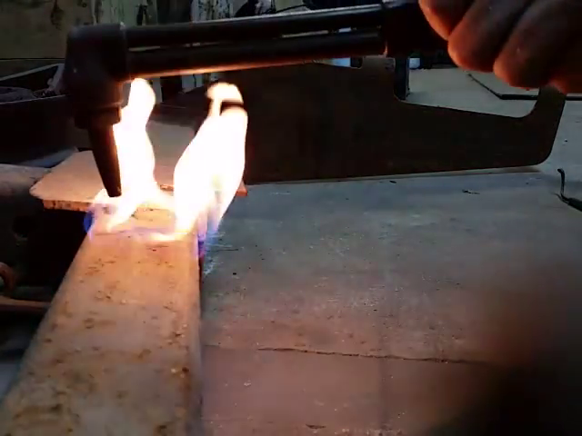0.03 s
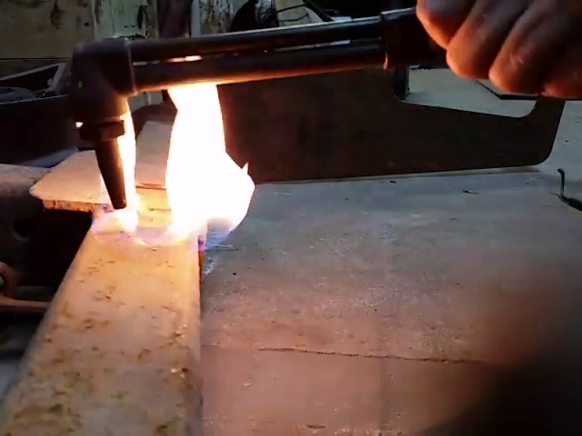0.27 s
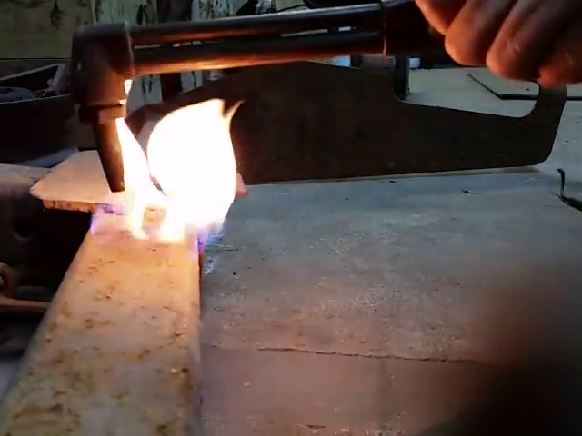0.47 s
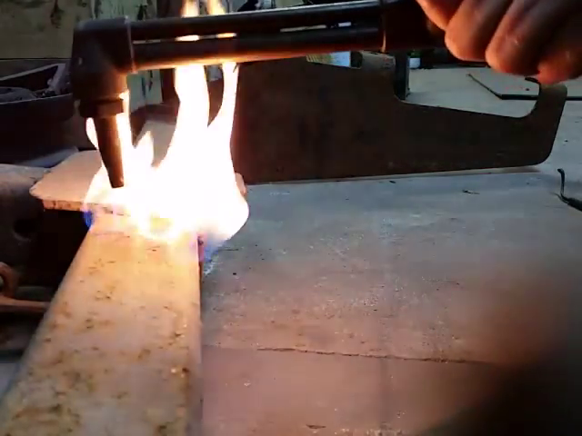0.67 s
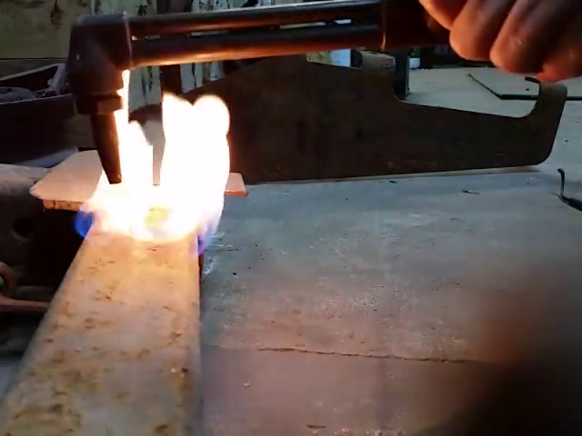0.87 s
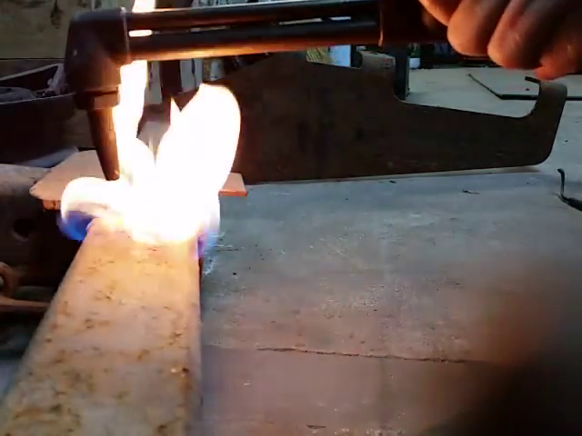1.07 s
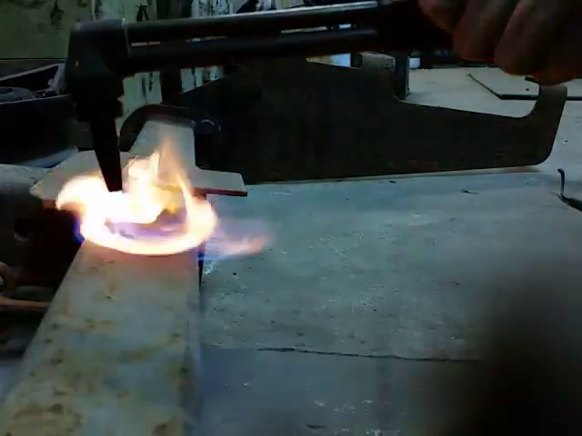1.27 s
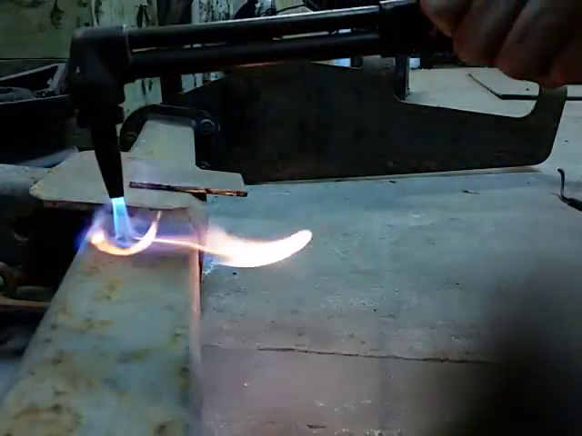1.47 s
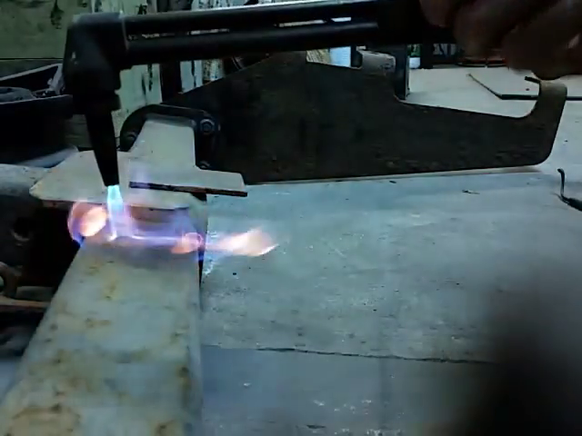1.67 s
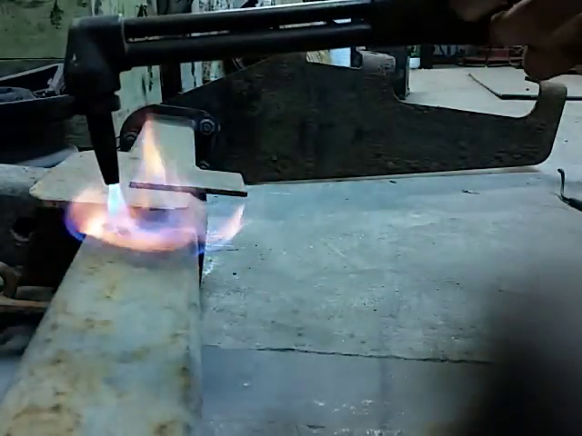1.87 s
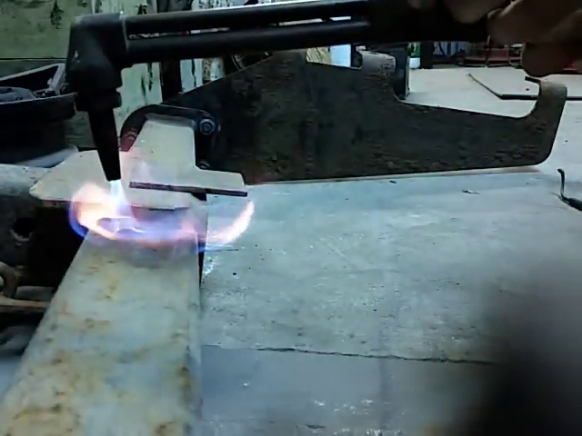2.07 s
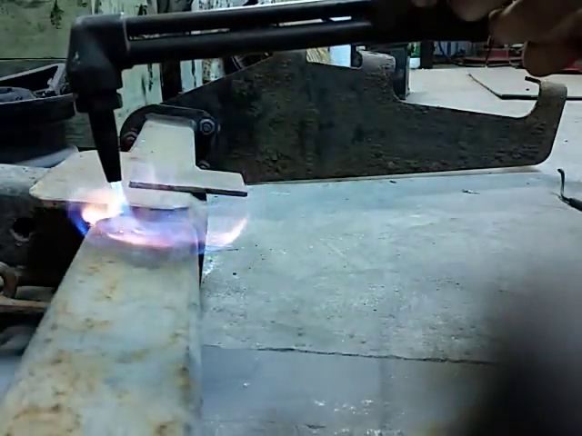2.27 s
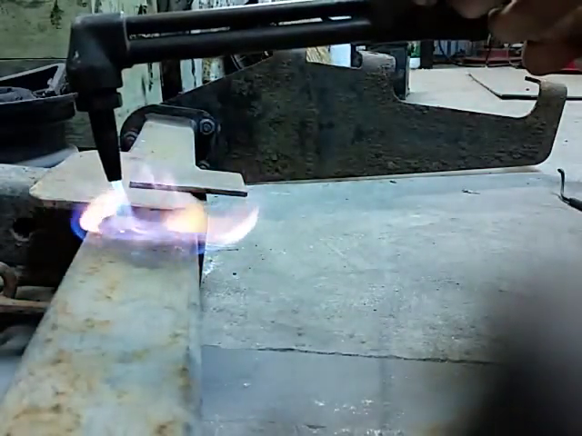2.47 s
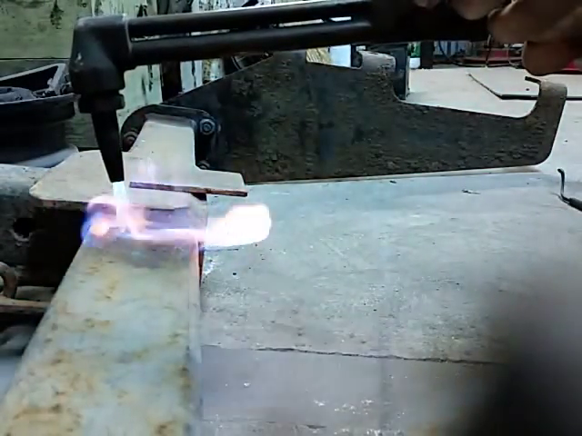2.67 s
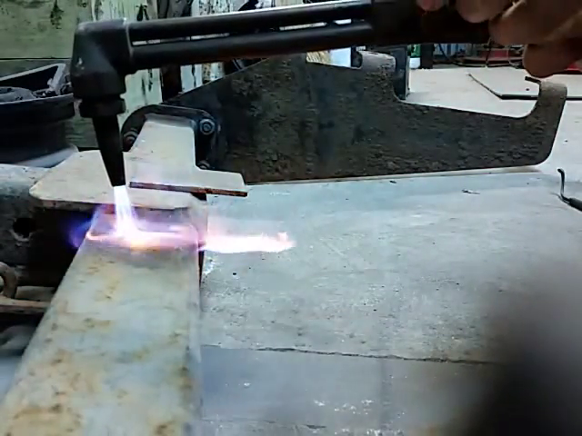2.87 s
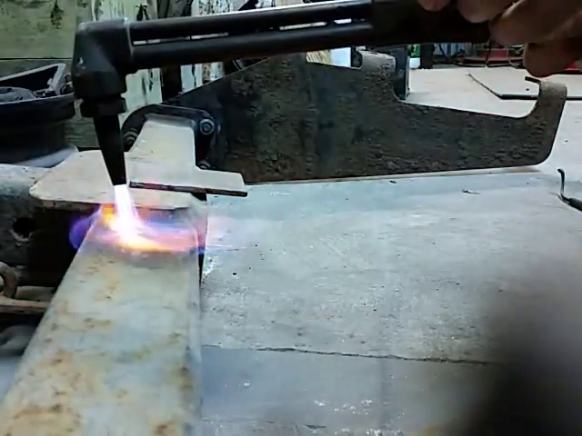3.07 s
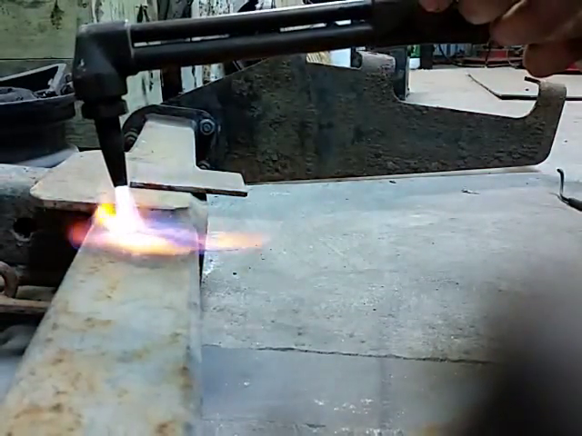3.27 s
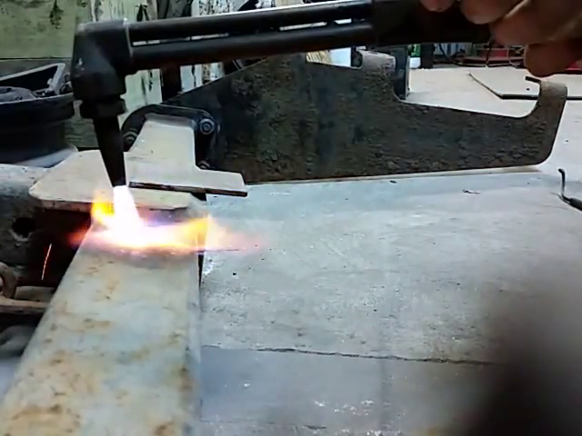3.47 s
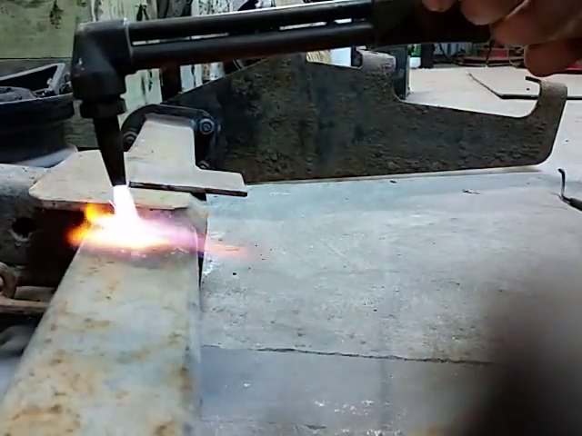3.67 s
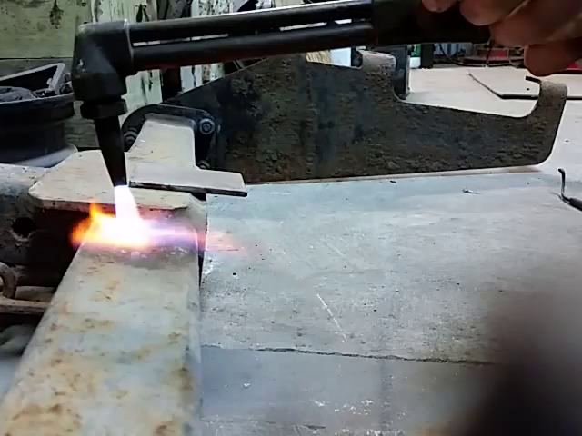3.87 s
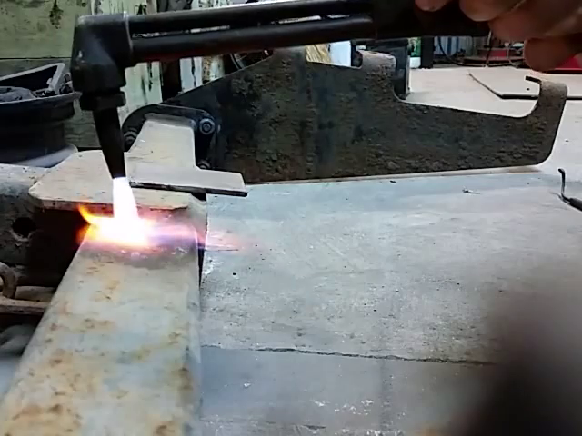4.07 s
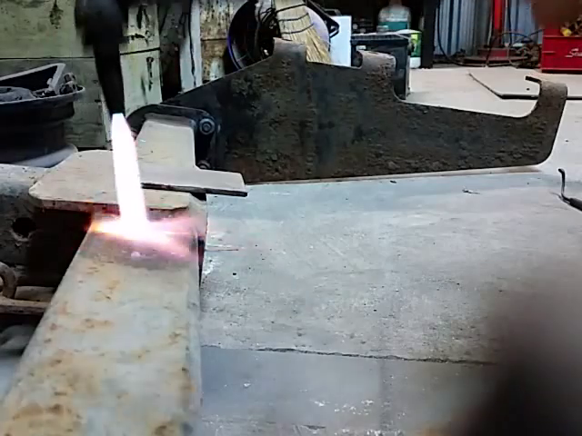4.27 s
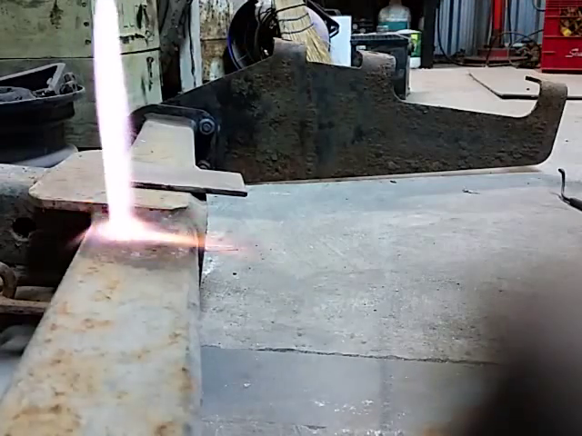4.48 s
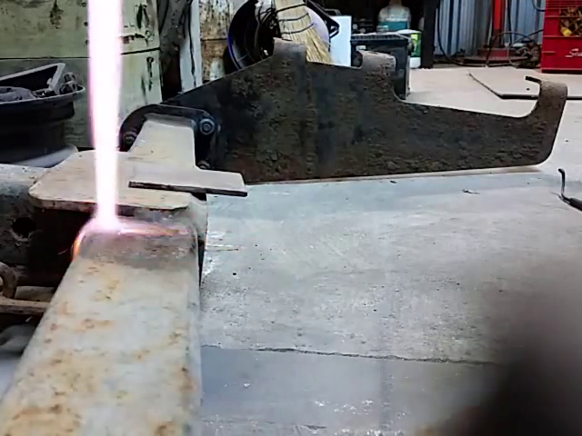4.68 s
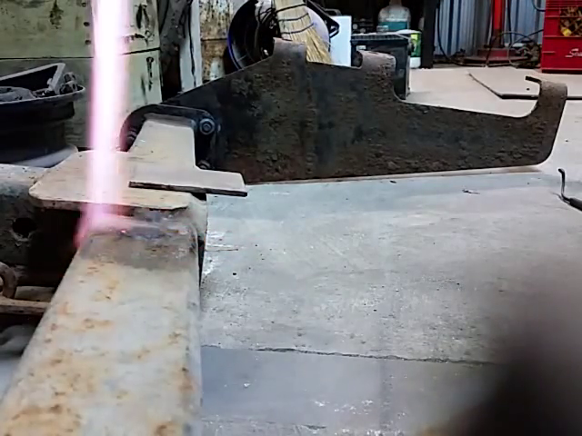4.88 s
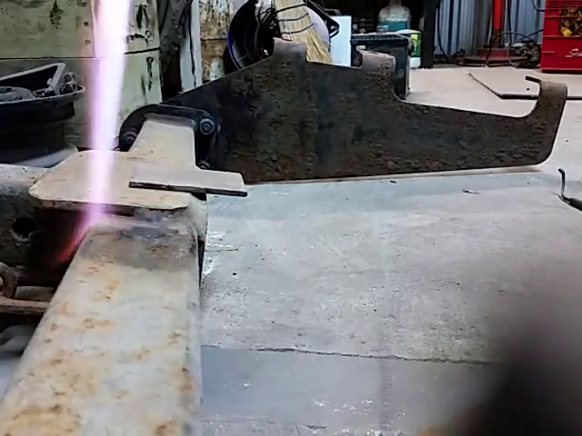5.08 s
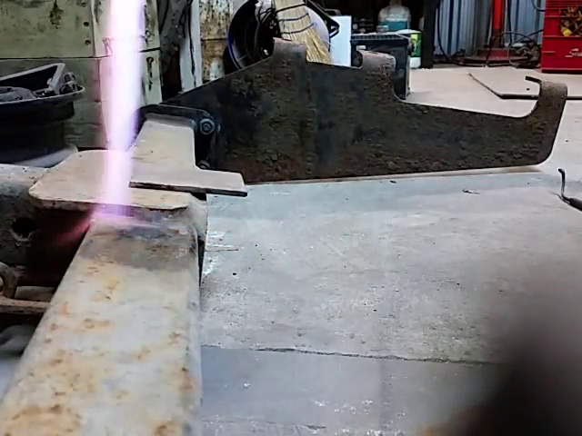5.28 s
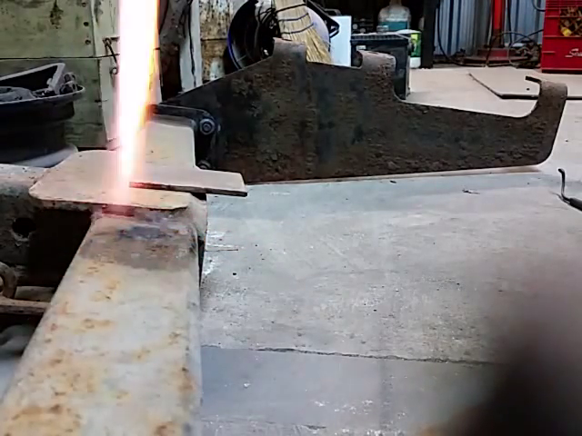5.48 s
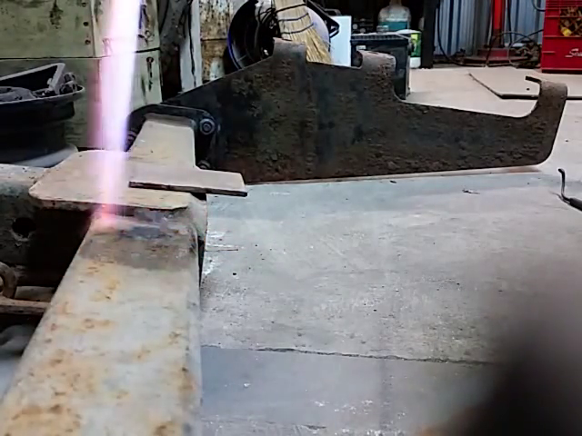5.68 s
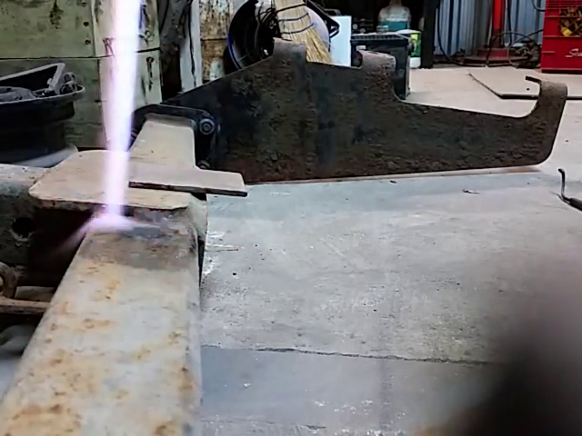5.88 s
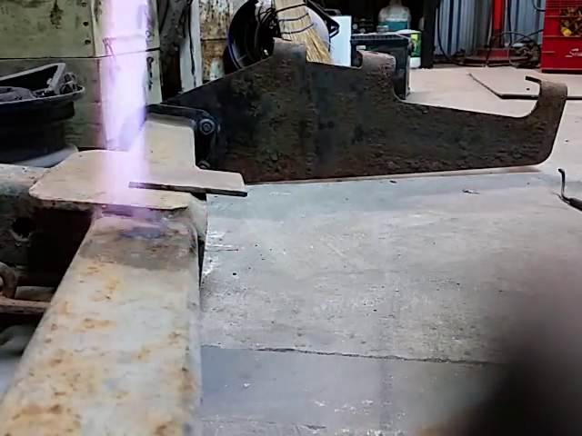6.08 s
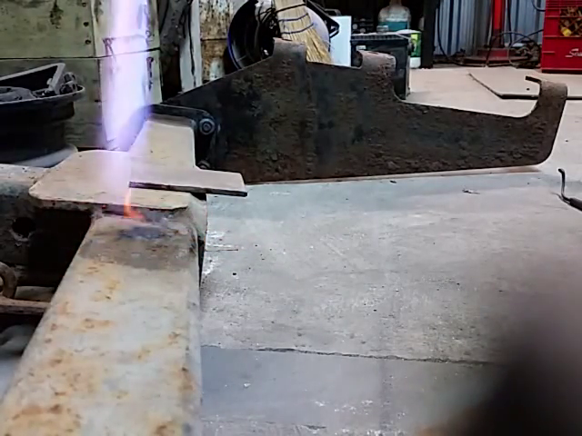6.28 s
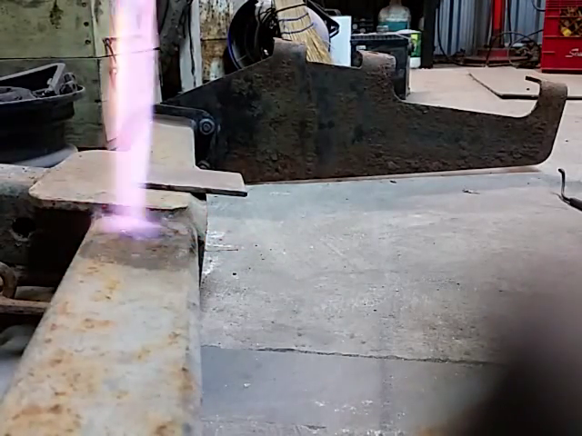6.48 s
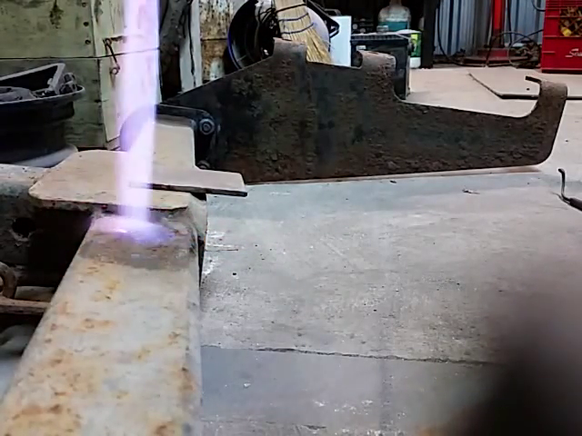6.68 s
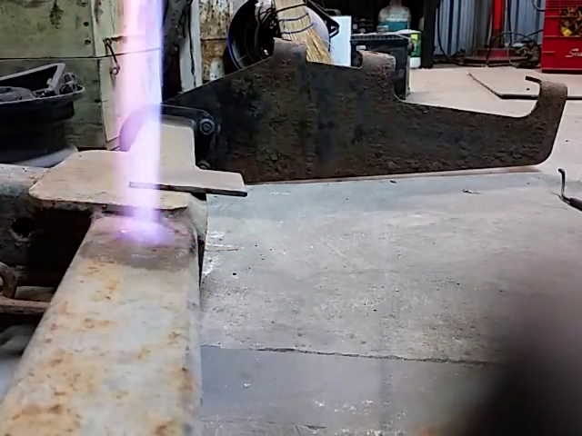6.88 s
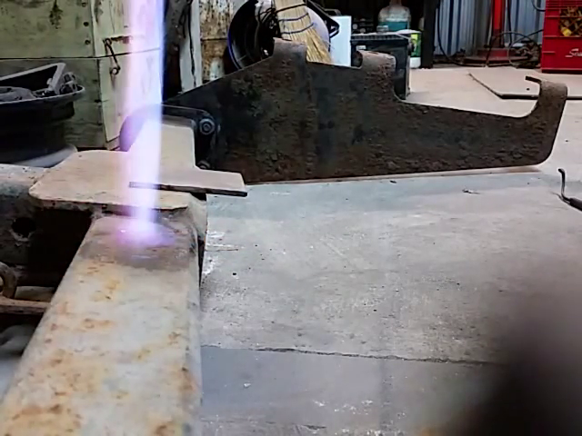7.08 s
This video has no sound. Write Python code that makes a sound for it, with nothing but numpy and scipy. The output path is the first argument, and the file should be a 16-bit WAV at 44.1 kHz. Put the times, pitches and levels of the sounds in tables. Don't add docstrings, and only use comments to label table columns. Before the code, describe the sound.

A gas torch flame starts almost silent, then sputters and roars on steel before sharpening into a loud, bright hissing jet that lifts away and flutters.

```python
import sys
import numpy as np
from scipy import signal
from scipy.fft import rfft, irfft, next_fast_len
from scipy.io import wavfile
from scipy.ndimage import uniform_filter1d, map_coordinates

SR = 44100
rng = np.random.default_rng(int(sys.argv[2]) if len(sys.argv) > 2 else 0)


def volts_from_db(level):
    exponent = np.asarray(level, float) / 20
    return 10 ** exponent


def persist_wave(psi):
    counts = np.round(np.clip(psi, -1, 1) * 32767).astype(np.int16)
    wavfile.write(sys.argv[1], SR, np.atleast_2d(counts).T)


N = 314433
TIME = np.arange(N) / SR
SIZE = next_fast_len(N + 4096)
HZ = np.maximum(np.arange(SIZE // 2 + 1) * SR / SIZE, 1)

RING_HZ = 10110
RISE_S = 4.28
STAGE_BLEND_S = 0.06
STAGE_START = [
    0,
    1.291,
    2.94,
    3.33,
    4.36,
    4.9,
    6.05,
    6.67,
]
# (flapping at a roar of -38 dB [dB], rush re roar [dB], room gain [dB])
BLAZE_STAGES = [(-40.5, -21, 4), (-49, -13.5, 7.5), (-49.5, -6.5, 12.5), (-44, -6.5, 14), (-36, -4, 10.5),
                (-31.5, -8, 15), (-22, -6, -8), (-25.5, -4.5, -8)]
# (time [s], half length [s], hiss [dB], port ring re hiss [dB])
HAND_WAVERS = [(1.93, 0.08, -1.5, -7.5), (2.154, 0.031, -2.5, -7), (2.258, 0.063, -1.5, -4),
               (2.499, 0.059, -9.5, 6.5), (2.683, 0.068, -8, -2), (2.792, 0.057, -7.5, -8),
               (3.472, 0.23, -5.5, -2.5), (4.065, 0.067, -0.5, -2.5), (4.402, 0.086, -12, 6.5),
               (4.62, 0.083, 1.5, -9), (4.72, 0.086, -2, -3), (5.28, 0.3, -6, 1), (5.66, .15, -2.5, 0),
               (5.88, 0.11, -3.5, -4), (5.95, 0.029, 3, -4), (6.512, 0.15, -8.5, 4),
               (6.712, 0.059, 1, 10.5), (6.988, 0.085, 4, 3)]


def columns(table):
    s, *rest = np.transpose(table)
    return [np.interp(TIME, s, c) for c in rest]


def ramp(s, length):
    return np.clip((TIME - s) / length, 0, 1)


def bumps(s, half, size):
    return sum(v * np.clip(1 - abs(TIME - a) / h, 0, 1) for a, h, v in zip(s, half, size))


def staged(table):
    rows = np.array(table, float)[np.searchsorted(STAGE_START[1:], TIME)]
    return uniform_filter1d(rows, size=int(STAGE_BLEND_S * SR), axis=0).T


def walk(rate):
    k = int(SR / rate)
    held = np.repeat(rng.standard_normal(N // k + 1), k)
    return 0.86 * uniform_filter1d(uniform_filter1d(held, k), k)[:N]


def unit(x):
    return x / np.sqrt(np.mean(x ** 2))


def over_hz(points):
    hz, value = np.transpose(points)
    return np.interp(np.log(HZ), np.log(hz), value)


def filtered(x, gain):
    return irfft(rfft(x, SIZE) * gain, SIZE)[..., :N]


def shaped(x, points):
    inside = (HZ > points[0][0]) & (HZ < points[-1][0])
    return unit(filtered(x, volts_from_db(over_hz(points)) * inside))


def resonance(hz, width_hz):
    return 1 / (1 + 1j * (HZ - hz * hz / HZ) / width_hz) ** 2


def delayed(x, ms):
    return map_coordinates(x, [np.arange(N) - ms * SR / 1000], order=5, mode="nearest")


def panned(db):
    gains = volts_from_db(np.array([db, -db]) / 2)
    return gains / np.sqrt(np.mean(gains ** 2, axis=0))


def eddies(alike, flicker):
    alike = np.clip(alike, 0, 1)
    direct = rng.standard_normal(N)
    scattered = rng.standard_normal((2, N))
    return flicker * (np.sqrt(alike) * direct + np.sqrt(1 - alike) * scattered)


def room():
    # (frequency [Hz], density [dB per Hz])
    floor_colour = [(15, -32), (30, -4), (55, 1.5), (110, 0), (150, -18), (300, -22), (420, -26.5),
                    (900, -43), (1600, -48), (3000, -66)]
    # (frequency [Hz], rms level [dB])
    hum_lines = [(120, -72), (240, -76.5)]
    hum = sum(volts_from_db(db - 2 + 1.8 * walk(1)) * np.sin(2 * np.pi * hz * TIME) for hz, db in hum_lines)
    floor = shaped(eddies(0.72, volts_from_db(4.0 * walk(1.73))), floor_colour) * volts_from_db(-70)
    return (floor + hum) * volts_from_db(staged(BLAZE_STAGES)[2])


def spits():
    # (time [s], peak [dB], thump [dB])
    spit_events = [
        (1.6034, -46, -70),
        (1.649, -35, -56),
        (1.71, -31, -50),
        (2.5864, -25, -50),
        (2.9024, -24, -60),
        (2.917, -22, -60),
        (2.921, -24, -60),
        (2.963, -25, -41),
        (2.979, -36, -60),
    ]
    t = np.arange(1200) / SR
    ticks, thumps = np.zeros((2, N)), np.zeros(N)
    thump = np.exp(-t / 0.007) * np.sin(2 * np.pi * 330 * t)
    grits = rng.standard_normal((len(spit_events), len(t)))
    for (s, db, thump_db), grit in zip(spit_events, grits):
        tick = np.exp(-t / 0.0006) * (np.sin(2 * np.pi * RING_HZ * t) + 0.7 * grit)
        i = int(s * SR)
        ticks[:, i:i + len(t)] += volts_from_db(db + np.array([[6], [-8]])) * tick
        thumps[i:i + len(t)] += volts_from_db(thump_db) * thump
    return filtered(ticks, resonance(11500, 9000) ** 2) + thumps


def flame():
    # (frequency [Hz], density [dB per Hz])
    flap_colour = [(20, -27), (40, -9), (75, -0.5), (124, -1), (193, -3), (284, -12.5), (375, -13),
                   (500, -22.5), (650, -26.5)]
    roar_colour = [(120, 2.5), (220, 0), (400, 4), (600, -1), (800, 0.5), (900, -14), (1100, -11)]
    rush_colour = [(600, -25), (850, -9), (1000, -5), (1300, -1), (1750, 0), (2250, -3), (2750, -10),
                   (3300, -17), (4200, -28)]
    # (time [s], roar [dB])
    burn = [(0, -66.5), (.81, -72.5), (1.11, -65.5), (1.22, -58), (1.36, -38), (1.49, -48), (1.51, -58),
            (1.62, -68), (1.65, -50.5), (1.73, -41.5), (2.0, -36), (2.42, -33.5), (2.76, -31.5),
            (2.82, -42.5), (3.02, -59.5), (4.15, -63), (4.49, -59), (7.13, -58)]
    # (time [s], flapping over its usual level [dB])
    folds = [(1.36, 14), (1.46, 12), (1.97, -2), (2.73, 0), (2.97, 8.5), (4.98, 2), (5.05, 4), (5.13, 6),
             (5.241, 11), (5.299, 12), (5.359, 5.5), (5.572, 11.5), (5.72, 14), (5.82, 7.5), (5.9, 5),
             (5.98, -14), (6.07, -5), (6.18, 2.5), (6.37, 5.5), (6.5, 3), (6.651, 7), (6.77, -8), (6.86, 5),
             (6.98, 6.5), (7.059, 6.5)]
    fold_attack_s, fold_decay_s = 0.012, 0.051

    on_steel = 1 - ramp(STAGE_START[2], STAGE_BLEND_S)
    roar_db = columns(burn)[0] + 0.88 * on_steel * bumps(*np.transpose(HAND_WAVERS)[:3])
    fold_db = np.zeros(N)
    for s, db in folds:
        fold_db += db * ramp(s, fold_attack_s) * (1 - ramp(s + fold_attack_s, fold_decay_s))
    flap_db, rush_db, _ = staged(BLAZE_STAGES)
    flap_db = flap_db + 0.65 * (roar_db + 38) + fold_db
    rush_db = rush_db + roar_db
    roar_db = roar_db + 0.5 * fold_db * (1 - on_steel)

    unrest = walk(16)
    pockets = (rng.random(N) < 120 / SR) * volts_from_db(2.6 * rng.exponential(size=N))
    churn = 0.37 * unit(pockets - pockets.mean())
    flap = eddies(0.98, volts_from_db(1.0 * unrest)) + churn
    roar = eddies(0.9, volts_from_db(0.57 * unrest + 2.8 * walk(60))) + 0.74 * churn
    rush = eddies(0.82, volts_from_db(1.1 * unrest + 1.5 * walk(90)))
    flap = shaped(flap, flap_colour) * volts_from_db(flap_db - 4.5)
    roar = shaped(roar, roar_colour) * volts_from_db(roar_db - 7.0)
    rush = shaped(rush, rush_colour) * volts_from_db(rush_db + 3.5)
    return flap + roar + rush


def flow():
    # (time [s], length [s], depth [dB])
    falters = [
        (2.797, .021, -11),
        (2.926, .035, -12),
    ]
    db = np.zeros(N)
    for s, length, depth_db in falters:
        refill = np.clip((s + length - TIME) / length ** 2 / 14, 0, 1)
        db += depth_db * ramp(s, 0.002) * refill
    return volts_from_db(db)


def bounce(x):
    held = ramp(RISE_S + 0.42, 0.2)
    rise_ms = 0.32 * np.clip(TIME - RISE_S, 0, 0.7)
    path_ms = 0.092 + rise_ms + 0.07 * held * walk(2.5)
    near_share, held_share = 0.5, 0.3
    port_share = np.array([[1], [0.4]])
    share = ramp(RISE_S, 0.12) * (near_share + (held_share - near_share) * held) * port_share
    share = np.maximum(share, held_share * held)
    late = np.array([delayed(c, path_ms) for c in x])
    return (x - share * late) / np.sqrt(1 + share ** 2)


def jet():
    # (frequency [Hz], density [dB per Hz])
    top_colour = [(6500, -28), (9000, -15), (10500, -5), (12300, 2), (13500, 0), (15000, -2), (16200, -2)]
    lower_colour = [(1100, -56), (1800, -6), (3000, -2.5), (4000, -4), (5000, 4.5), (6500, 4.5), (8000, 7),
                    (10000, 5), (11500, 16.5)]
    # (time [s], hiss at the nozzle [dB])
    valve = [(0, -88.5), (.67, -104), (1.09, -85.5), (1.27, -65), (1.41, -44), (1.47, -58), (1.59, -86),
             (1.65, -58), (1.73, -48), (2.92, -43.5), (3.02, -63), (3.29, -51.5), (3.37, -35.5),
             (3.62, -30.5), (4.29, -30), (6.0, -33.5), (6.09, -45.5), (7.13, -47)]
    # (time [s], left minus right in the port ring, over 23 dB [dB])
    aim = [(0, 7), (1.13, 6), (1.55, 8), (1.8, 26), (3.1, 35), (3.53, 43), (4.27, 46), (4.63, 11),
           (5.44, -6.5), (7.13, -11)]
    # (port ring re hiss [dB], lower hiss re hiss [dB], plume share [0-1],
    # left minus right [dB])
    nozzle_stages = [(11, -36, 0.8, 11), (7, -17, 1, 12.5), (7, -13.5, 0.25, 9), (4, -13.5, 0, 14.5),
                     (1.5, -12.5, 0.01, 6.5), (7.5, -14.5, 0.1, 6), (6.5, -6.5, 0.8, 2), (1, -3, 0.37, -14)]
    likeness = [(.7,), (.78,), (.8,), (.93,), (.97,), (.98,), (.93,), (.97,)]

    s, half, hiss_db, colour_db = np.transpose(HAND_WAVERS)
    waver_db = bumps(s, half, hiss_db)
    valve_db = columns(valve)[0]
    hiss_db = valve_db + waver_db
    faint_db = np.maximum(-50.5 - valve_db, 0)
    ring_db, lower_db, plume_share, pan_db = staged(nozzle_stages)
    pan_db = pan_db + 1.4 * waver_db
    ring_db = ring_db + 0.14 * faint_db + bumps(s, half, colour_db)
    lower_db = lower_db + 0.43 * faint_db - 0.72 * waver_db

    flicker = volts_from_db(0.86 * walk(25) + 0.38 * walk(250) + 1.9 * walk(1500))
    fine = eddies(0.84, flicker)
    coarse = eddies(staged(likeness)[0], flicker)

    shoulder_db = np.minimum(ring_db, 4.0) / 2 - 6.0 - 0.57 * faint_db
    ring = unit(filtered(fine, resonance(RING_HZ, 1820))) * volts_from_db(ring_db + 0.5)
    shoulder = unit(filtered(fine, resonance(9720, 3230))) * volts_from_db(shoulder_db)
    cavity = (ring + shoulder) * panned(columns(aim)[0] + 23.0)

    top = shaped(fine, top_colour) * volts_from_db(6.5) * panned(pan_db)
    crest = unit(filtered(fine, resonance(11560, 2200))) * volts_from_db(2.5)
    lifted = ramp(STAGE_START[5] - 0.1, 0.1)
    top = top * volts_from_db(-0.5 * lifted) + lifted * crest

    plume_share = np.clip(plume_share, 0, 1)
    plume = unit(filtered(coarse, resonance(3620, 3260)))
    lower = np.sqrt(1 - plume_share) * shaped(coarse, lower_colour) + np.sqrt(plume_share) * plume
    lower = lower * volts_from_db(lower_db + 6.0) * panned(0.1 * pan_db - 0.6)
    return bounce((cavity + top + lower) * volts_from_db(hiss_db) * flow())


def near_echoes(nozzle):
    # (delay [ms], level [dB])
    surfaces = [
        [(1.04, -16.5), (3.3, -5.5)],
        [(1.24, -1.5), (2.1, -13)],
    ]
    echoes = np.array([sum(volts_from_db(db) * np.exp(-2j * np.pi * HZ * ms / 1000) for ms, db in side)
                       for side in surfaces])
    echoes = echoes / (1 + (7000 / HZ) ** 6)
    left_over = 0.27
    return (1 - (1 - left_over) * ramp(RISE_S, 0.57)) * filtered(nozzle, echoes)


def scene():
    nozzle = jet() + spits()
    return room() + flame() + nozzle + near_echoes(nozzle)


def masked_bands(x, below_db, never_over_db, chance_db):
    hz, _, spec = signal.stft([x[0] + x[1], x[0] - x[1]], SR, nperseg=2048)
    power = uniform_filter1d(np.abs(spec) ** 2 / 2, size=8, axis=1)[:, ::8]
    db = 10 * np.log10(power + 1e-20)
    treble = hz[::8] > 1900
    limit = np.minimum(db[:, treble].max(axis=(0, 1)) - below_db, never_over_db)
    chance = np.sqrt(5) * uniform_filter1d(rng.standard_normal(db.shape), size=5, axis=2)
    limit = limit + chance_db * chance
    soft = 1 / (1 + np.exp(np.clip(limit - db, -30, 30)))
    keep = np.where(treble[:, None], soft, 1)
    keep = np.repeat(keep, 8, axis=1)[:, :len(hz)]
    mid, side = signal.istft(spec * keep, SR, nperseg=2048)[1][:, :N]
    return np.array([mid + side, mid - side]) / 2


def band_limit(x):
    return signal.sosfilt(signal.butter(12, 16760, fs=SR, output="sos"), x)


def record(dry):
    # (frequency [Hz], left minus right [dB])
    port_balance = [(50, -3.5), (200, -6.5), (400, -4), (1300, 0.5), (6000, -4.5), (16000, -3)]
    pan = volts_from_db(over_hz(port_balance) / 2)
    low_ms, jet_ms, high_ms = 0.175, 0.192, 0.133
    lag_ms = low_ms + (jet_ms - low_ms) * ramp(3, 0.4) + (high_ms - jet_ms) * ramp(RISE_S + 0.07, 0.25)
    ports = np.array([dry[0], delayed(dry[1], lag_ms)])
    ports = masked_bands(ports, below_db=38, never_over_db=-85.5, chance_db=6.5)
    ports = ports + volts_from_db(-87) * rng.standard_normal((2, N))
    top_cut = np.sin(np.pi / 2 * np.clip((15800 - HZ) / 200, 0, 1)) ** 2
    return band_limit(filtered(ports, np.array([pan, 1 / pan]) * top_cut))


dry = scene()
out = record(dry)
persist_wave(out)
```